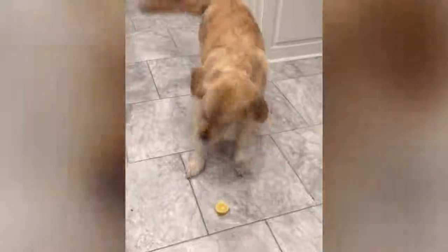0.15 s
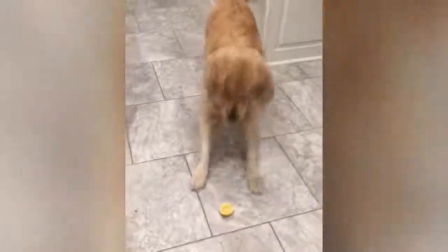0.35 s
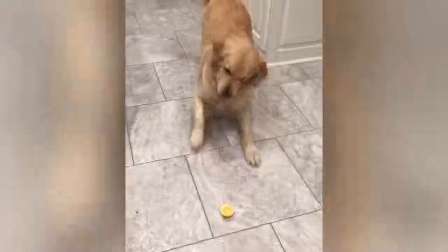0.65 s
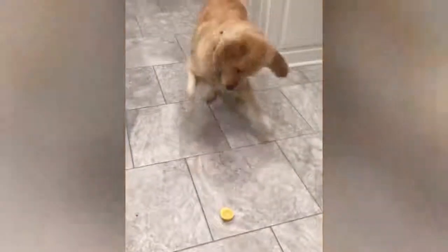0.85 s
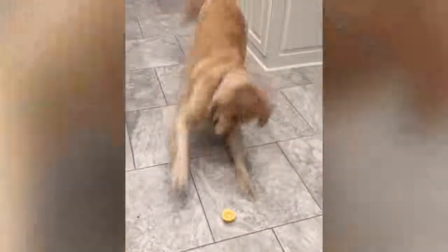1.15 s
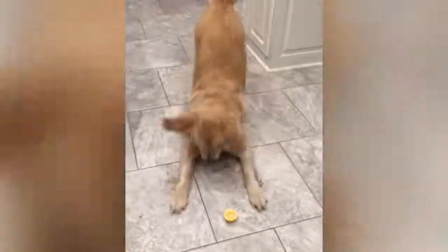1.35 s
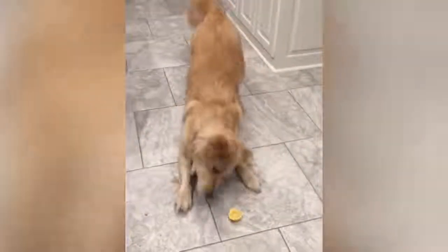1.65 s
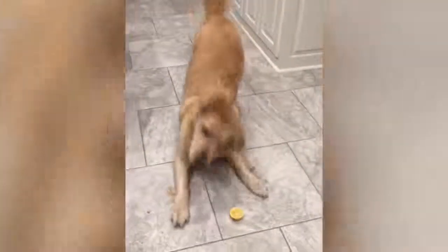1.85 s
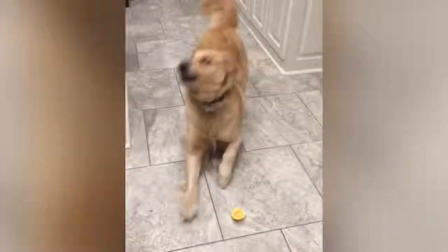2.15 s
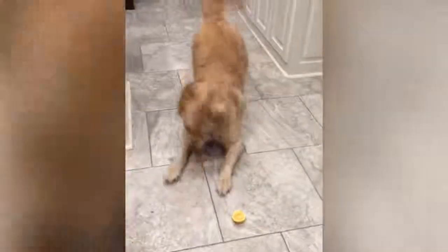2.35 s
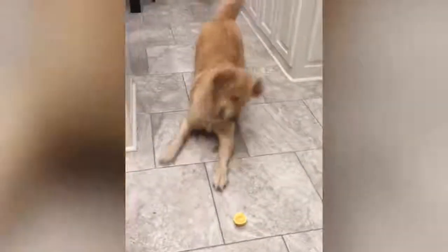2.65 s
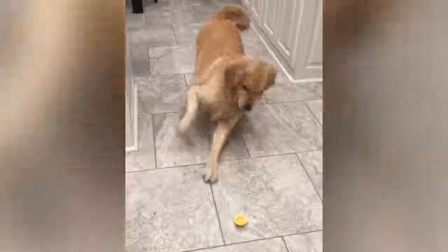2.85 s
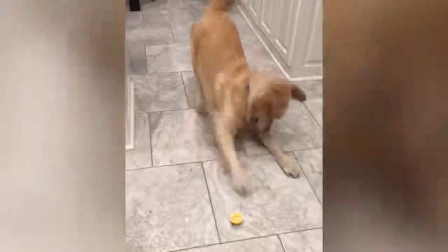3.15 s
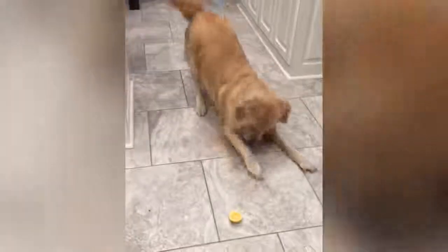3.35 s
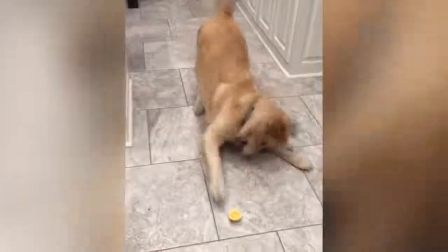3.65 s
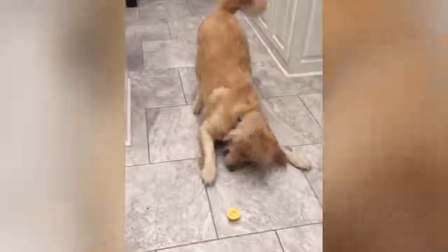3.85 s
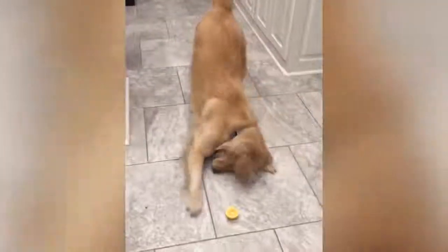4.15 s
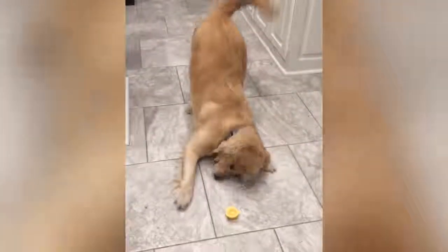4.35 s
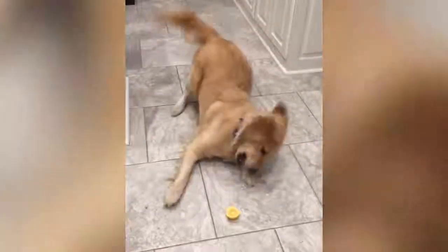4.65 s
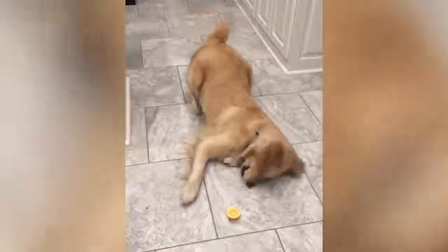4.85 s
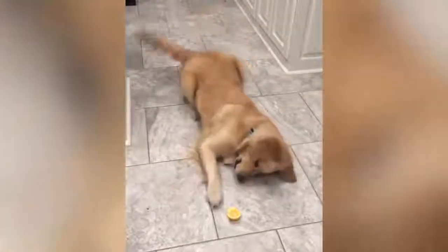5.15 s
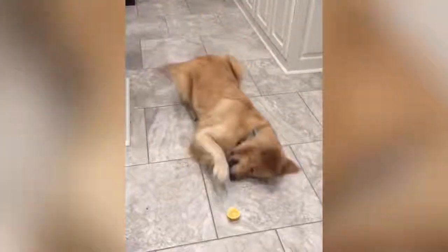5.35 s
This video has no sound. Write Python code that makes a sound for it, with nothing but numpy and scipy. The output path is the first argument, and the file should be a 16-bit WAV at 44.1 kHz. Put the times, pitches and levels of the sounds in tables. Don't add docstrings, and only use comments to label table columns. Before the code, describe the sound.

A dog's claws tick and rake on hard kitchen tile as its paws skid, thud and squeal, with collar tags clinking over a faint hum.

```python
import sys
import numpy as np
from scipy import signal
from scipy.fft import rfft, irfft
from scipy.io import wavfile
from scipy.ndimage import uniform_filter1d

SR = 44100
rng = np.random.default_rng(int(sys.argv[2]) if len(sys.argv) > 2 else 0)


def dump_mix(stems):
    frames = np.atleast_2d(stems).T
    limited = np.clip(frames, -1, 1)
    pcm = np.round(limited * 32767).astype(np.int16)
    wavfile.write(sys.argv[1], SR, pcm)


def undo_db(level):
    steps = np.asarray(level, float) / 20
    return 10 ** steps


N = 243431
CONTROL_STEP = 32


def evened(x):
    return x / np.sqrt(np.mean(x ** 2) + 1e-20)


def read(points, hz):
    f, value = np.transpose(points)
    return np.interp(np.log(hz + 1), np.log(f + 1), value)


def add(mix, s, sound):
    part = mix[round(s * SR):][:len(sound)]
    part += sound[:len(part)]


def coloured(x, points):
    hz = np.fft.rfftfreq(len(x), 1 / SR)
    return evened(irfft(rfft(x) * undo_db(read(points, hz)), len(x)))


def resonate(x, hz, width_hz):
    turn = np.exp(2j * np.pi * np.cumsum(hz * np.ones(len(x))) / SR)
    r = np.exp(-np.pi * width_hz / SR)
    return 2 * (turn * signal.lfilter([1 - r], [1, -r], x / turn)).real


def grit(per_s, spread_db, smooth, clump_db):
    size = undo_db(spread_db * np.minimum(rng.exponential(1, N), 4)) * (rng.random(N) < per_s / SR)
    slips = evened(size * rng.choice([-1., 1.], N)) + smooth * rng.standard_normal(N)
    clumps = evened(uniform_filter1d(uniform_filter1d(rng.standard_normal(N), 300), 300))
    return slips * undo_db(clump_db * clumps)


def swells(rows):
    fade_db = 25.5
    rise_bend, fall_bend = 1.36, 1.22
    s, db, rise, fall = np.array(rows)[:, :4].T[:, :, None]
    since = np.arange(0, N + CONTROL_STEP, CONTROL_STEP) / SR - s
    lost = np.where(since < 0, abs(since / rise) ** rise_bend, abs(since / fall) ** fall_bend)
    return undo_db(2 * np.maximum(db - fade_db * lost, -200)), since


def spread(control):
    return np.interp(np.arange(N) / CONTROL_STEP, np.arange(len(control)), control)


def level(power, rest_db):
    return spread(np.sqrt(power.sum(0) + undo_db(2 * rest_db)))


def hum():
    # frequency in Hz, level in dB per Hz.
    hum_spectrum = [(15, -67), (25, -17), (70, 4), (166, -3.5), (217, -18), (285, 2), (317, 1),
                    (427, -13.5), (516, -16), (607, -7.5), (840, -9), (1290, -8.5), (16000, -39)]
    hum_db, drift_db = -71, 0.12
    drift = evened(uniform_filter1d(rng.standard_normal(N), 3000))
    return undo_db(hum_db + drift_db * drift) * coloured(rng.standard_normal(N), hum_spectrum)


def room(x):
    # frequency in Hz, t60 in seconds.
    decay = [(100, 0.32), (300, 0.67), (1000, 0.58), (3000, 0.48), (8000, 0.42), (16000, 0.15)]
    # delay in ms, level in dB.
    echoes = [(4.5, -27), (7.3, -17.5), (10.2, -18), (15.6, -15), (21.4, -23), (27.7, -21.5)]
    tail_db = -8.5
    taps = np.zeros(SR // 2)
    at = np.arange(100, len(taps) - 20, 20)
    taps[at + rng.integers(0, 20, len(at))] = rng.choice([-1., 1.], len(at))
    hz, t, z = signal.stft(taps, SR, nperseg=256)
    tail = signal.istft(z * undo_db(-60 * t / read(decay, hz)[:, None]), SR, nperseg=256)[1]
    tail = undo_db(tail_db) * tail / np.linalg.norm(tail)
    for ms, db in echoes:
        tail[round(ms * SR / 1000)] += undo_db(db)
    return signal.fftconvolve(x, tail)[:N]


def weight_shifts():
    # start of the heave's peak in seconds, level in dB, rise and fall in seconds.
    heaves = [(.6, -83, 0.066, 0.83), (1.3, -55.5, 0.079, 0.2), (1.41, -60.5, 0.13, 0.31),
              (2.2, -65, 0.15, 0.14), (2.33, -64.5, 0.037, .3), (2.724, -65.5, 0.2, 0.025),
              (2.9, -63.5, 0.16, 0.73), (3.265, -46, 0.057, 0.2), (3.9, -65.5, 0.63, 0.32),
              (4.205, -55, 0.058, 0.14), (4.5, -65, 0.56, 0.5)]
    # frequency in Hz, level in dB per Hz.
    rumble_spectrum = [(24, -47), (40, -16), (85, -2), (191, -0.5), (229, -3.5), (401, -8), (551, -8),
                       (747, -11), (1500, -20.5), (1950, -21), (3300, -120)]
    rumble = coloured(grit(per_s=400, spread_db=0.5, smooth=1.14, clump_db=4.0), rumble_spectrum)
    return level(swells(heaves)[0], rest_db=-72) * rumble


def squeaks():
    # start in seconds, level in dB, pitch in Hz, t60 in seconds.
    rubs = [(1.729, -65, 1550, 0.075), (2.135, -62, 2490, 0.13), (2.157, -59, 1500, 0.14),
            (2.157, -57.5, 630, 0.084), (1.413, -48.5, 1420, 0.048), (2.195, -59.5, 887, 0.3),
            (3.115, -64, 930, 0.11), (3.639, -47, 1485, 0.037), (3.642, -60, 2090, 0.21),
            (4.968, -63.5, 2630, 0.12), (4.968, -44.5, 5600, 0.023), (5.001, -56.5, 2660, 0.082),
            (5.001, -62, 2210, 0.17)]
    out, t = np.zeros(N), np.arange(6000) / SR
    noises = rng.standard_normal((len(rubs), len(t)))
    for (s, db, hz, t60), noise in zip(rubs, noises):
        tone = evened(resonate(resonate(noise, hz, width_hz=170), hz, width_hz=280))
        onset = 1 - np.exp(-t / 0.00059)
        add(out, s, undo_db(db - 60 * t / t60) * tone * onset)
    return out


def tags():
    # start in seconds, then levels in dB of tick, small tag, large tag, large tag's high mode.
    knocks = [(1.9, -47, -55, -45.5, -67), (2.119, -42, -73, -72, -61), (2.126, -31, -75, -57, -49.5),
              (2.132, -31, -58, -47, -48.5), (2.271, -40, -61, -53, -62), (2.304, -35, -59, -43, -64),
              (2.376, -24.5, -65, -52.5, -64), (2.5634, -21.5, -59, -77, -68.5),
              (4.6548, -35, -67, -74, -64), (4.865, -32, -71, -59, -68), (4.8862, -37, -88, -72, -70),
              (4.9673, -21.5, -65, -37.5, -49), (4.9998, -34, -59, -47, -55)]
    # level in dB of the hook that holds the tags, share of ring time left by the coat.
    holds = [(-64, 0.78), (-58, .4), (-52, 0.55), (-52, 0.57), (-54, 0.5), (-48, 0.76), (-62, .6),
             (-60, 0.41), (-62, 0.44), (-72, 0.34), (-72, 0.66), (-47, 1.05), (-56, 1.2)]
    mode_hz = [
        [7101, 7062, 10650, 5900],
        [8068, 8104, 9507, 10300, 12740],
        [14825, 14870, 9850, 13900],
        [15165, 12870, 15720],
    ]
    # level in dB, t60 in seconds.
    mode_decay = [
        [(10.5, 0.22), (-2, 0.44), (-2, 0.08), (-10, 0.018)],
        [(-2.5, 0.3), (-4.5, 0.39), (-17, 0.058), (-29, 0.095), (-9, 0.085)],
        [(10, 0.21), (-5, 0.16), (0, 0.25), (-29, .1)],
        [(-8, 0.093), (-17, 0.084), (-16, .06)],
    ]
    pressed_s = 5.115
    out, t = np.zeros(N), np.arange(9000) / SR
    phases = rng.random((len(knocks), 2, 20))
    for (s, tick_db, *parts_db), (hook_db, share), (phase, swing) in zip(knocks, holds, phases):
        ring = np.zeros(len(t))
        for k, part_db in enumerate(parts_db + [hook_db]):
            for m, (hz, (db, t60)) in enumerate(zip(mode_hz[k], mode_decay[k])):
                flutter_hz, wobble_hz = 25 + 45 * swing[5 * k + m], 20 + 30 * phase[5 * k + m]
                flutter_db = 3.0 * np.sin(2 * np.pi * (flutter_hz * t + phase[m]))
                wobble = .12 * np.sin(2 * np.pi * (wobble_hz * t + swing[m]))
                decay = undo_db(part_db + db + flutter_db - 60 * t / (t60 * share))
                ring += decay * np.sin(2 * np.pi * (hz * t + phase[5 * k + m] + wobble))
        tick = undo_db(tick_db - 11.0) * np.sin(2 * np.pi * 9500 * t) * np.exp(-t / 0.0005)
        ring *= undo_db(-np.maximum(s + t - pressed_s, 0) * 600)
        add(out, s, ring * (1 - np.exp(-t / 0.00022)) + tick)
    return out


def thuds():
    # start in seconds, peak in dB, slap pitch in Hz, t60 in seconds.
    falls = [(1.263, -32, 930, 0.024), (1.27, -42.5, 270, 0.18), (1.399, -40.5, 156, 0.034),
             (1.416, -39.5, 188, 0.07), (2.32, -43, 152, 0.058), (2.705, -45.5, 745, 0.11),
             (2.994, -48, 100, 0.053), (3.114, -54.5, 890, 0.071), (3.24, -25, 750, 0.033),
             (3.261, -46.5, 180, 0.072), (3.3, -48, 202, 0.45), (4.187, -38.5, 244, 0.085),
             (4.207, -42.5, 204, 0.23), (5.298, -54, 137, 0.046)]
    out, t = np.zeros(N), np.arange(8000) / SR
    puffs = rng.standard_normal((len(falls), len(t)))
    for (s, db, hz, t60), puff in zip(falls, puffs):
        push = np.sin(2 * np.pi * hz * t) * undo_db(-60 * t / (2.15 / hz * 4))
        narrow_hz = .55 * hz * (hz / 250) ** .4
        puff = evened(resonate(resonate(puff, hz, width_hz=narrow_hz), hz, width_hz=1.5 * hz))
        shape = (1 - np.exp(-t / 0.0044)) * undo_db(-60 * t / max(t60, .01))
        add(out, s + 0.00117, undo_db(db) * (push + 0.61 * puff * shape))
    return out


def drags():
    # most contact in seconds, level in dB, rise and fall in s, fur share in dB.
    sweeps = [(.432, -61, 0.2, 0.25, 0), (.51, -65, 0.14, 0.15, -14), (.8, -59.5, 0.15, 0.09, -11),
              (1.075, -86, .03, 0.055, 13), (1.21, -56.5, 0.12, 0.12, -1.5), (1.36, -57, 0.13, 0.26, -8),
              (1.55, -61, 0.23, 0.12, -9), (1.743, -66, 0.043, 0.26, -5.5), (2.136, -56.5, 0.097, 0.17, 0),
              (2.28, -56.5, 0.11, 0.059, -14), (2.499, -59.5, 0.21, 0.031, 1.5),
              (2.566, -57, 0.054, 0.068, 3), (2.724, -55, 0.027, 0.13, -6), (2.884, -67.5, 0.055, 0.44, -4),
              (3.0, -63, 0.034, 0.079, -3), (3.201, -53.5, 0.042, 0.18, -5), (3.5, -60.5, 0.38, 0.092, -11),
              (4.07, -61, 0.12, .2, -5.5), (4.144, -52, 0.061, 0.044, -11), (4.4, -63, 0.13, 0.35, -9),
              (4.552, -57, 0.13, 0.25, -4.5), (4.882, -60.5, 0.07, 0.28, -8),
              (5.31, -67.5, 0.023, .09, -10), (5.36, -74.5, 0.03, 0.04, 5), (5.45, -78.5, 0.16, .3, -16)]
    # peak in seconds, level in dB, fall in s, fur share in dB.
    scuffs = [(0.29, -65.5, 0.39, -2), (0.553, -47.5, 0.21, -8), (.708, -57.5, 0.19, -6),
              (1.134, -52, 0.1, -1), (1.269, -46.5, 0.13, -3.5), (1.873, -66.5, 0.47, 4),
              (2.307, -46.5, 0.052, -0.5), (3.245, -53.5, 0.31, -7), (3.605, -61, 0.092, -2),
              (3.755, -43, 0.14, -5), (4.188, -50, .18, -4), (4.974, -64, 0.11, 10),
              (5.123, -52.5, 0.11, -9)]
    # frequency in Hz, level in dB per Hz.
    claw_spectrum = [(1470, -17), (2500, -10), (2710, -2), (4170, 1.5), (4800, -1), (6040, 5),
                     (10000, -12.5), (13000, -20.5), (22000, -120)]
    # frequency in Hz, level in dB per Hz.
    fur_spectrum = [(5000, -45), (8500, 0.5), (10500, -5), (15600, -6.5), (16500, -9.5)]
    scuff_rise_s = 0.013
    moves = np.array(sweeps + [(s, db, scuff_rise_s, fall, fur_db) for s, db, fall, fur_db in scuffs])
    raking = swells(moves)[0]
    brush = grit(per_s=4400, spread_db=4.5, smooth=1.3, clump_db=1.5)
    fur_share = undo_db(2 * (moves[:, 4:] - 0.12 * moves[:, 1:2]))
    fur = level(raking ** 1.135 * fur_share, rest_db=-108) * coloured(brush, fur_spectrum)
    return level(raking, rest_db=-86) * coloured(brush, claw_spectrum) + fur


def skids():
    # most pressure in seconds, level in dB, rise and fall in seconds, resonance in Hz.
    slips = [(.29, -66.5, 0.026, 0.094, 3180), (.432, -67.5, 0.14, 0.12, 3090),
             (0.565, -41.5, 0.029, 0.24, 2930), (0.671, -46.5, 0.12, 0.21, 2040),
             (1.135, -58, 0.021, 0.22, 2840), (1.275, -62, 0.016, 0.31, 2830), (1.33, -63, .05, 0.11, 2200),
             (1.42, -59, 0.25, 0.2, 1700), (1.74, -57.5, 0.044, 0.05, 2900), (2.135, -69, 0.12, 0.95, 2900),
             (2.321, -44, 0.044, 0.23, 2800), (2.66, -62, 0.066, 0.19, 2100),
             (2.724, -49, 0.21, 0.15, 2000), (2.884, -55.5, 0.27, 0.25, 2200),
             (3.202, -57.5, 0.056, 0.037, 2620), (3.25, -63, 0.017, 0.18, 2600),
             (3.3, -56.5, 0.04, 0.11, 1800), (3.379, -50.5, 0.22, 0.23, 2600),
             (3.645, -62.5, 0.058, 0.099, 1700), (3.757, -45.5, .007, 0.1, 2950),
             (3.828, -44.5, 0.063, 0.15, 2400), (3.999, -54, 0.29, 0.24, 2180),
             (4.188, -54, 0.029, 0.2, 2750), (4.552, -56.5, 0.28, 0.27, 2000),
             (5.125, -57, 0.013, 0.24, 2590), (5.31, -55.5, 0.029, 0.11, 1980)]
    # ratio to the skid resonance, width in Hz, level in dB.
    ridges = [
        (0.702, 313, -14.5),
        (1.08, 320, -15.5),
        (1.32, 380, -21.5),
    ]
    sag_hz_per_s, lowest_hz = 3900, 1797
    rest_db, rest_hz = -78.5, 2100
    pads, since = swells(slips)
    each_hz = np.maximum(np.array(slips)[:, 4:] - sag_hz_per_s * np.maximum(since, 0), lowest_hz)
    rest = undo_db(2 * rest_db)
    hz = spread(((pads * each_hz).sum(0) + rest * rest_hz) / (pads.sum(0) + rest))
    rub = grit(per_s=1800, spread_db=3.4, smooth=.65, clump_db=1.5)
    skid = resonate(resonate(rub, .93 * hz, width_hz=1700), .93 * hz, width_hz=2400)
    skid += undo_db(-15.5) * resonate(rub, 0.59 * hz, width_hz=720)
    skid = evened(skid)
    sway = 1 + .05 * evened(uniform_filter1d(np.roll(rub, SR), 1500))
    squeal = np.zeros(N)
    for ratio, width, db in ridges:
        ridge_hz = ratio * hz * sway
        squeal += undo_db(db) * evened(resonate(resonate(rub, ridge_hz, width), ridge_hz, width))
    skid = signal.sosfilt(signal.butter(2, 520, "high", fs=SR, output="sos"), skid + squeal)
    return level(pads, rest_db) * evened(skid)


def ticks():
    # start in seconds, peak in dB, pitch in Hz. The first two are small clinks of the collar hook.
    catches = [(0.279, -48, 12800), (0.287, -47, 5500), (0.5666, -32, 3160), (0.5732, -33, 3120),
               (0.616, -35, 2980), (0.6544, -29, 2430), (0.675, -38, 2470), (0.7972, -36, 5400),
               (2.3105, -30, 2580), (2.325, -46, 5400), (2.3412, -55, 2820), (3.1983, -33, 5980),
               (3.2526, -24, 6100), (3.3552, -35, 2350), (3.367, -24, 3260), (3.763, -27, 5470),
               (3.8104, -32, 2890), (3.83, -46, 1500), (3.8422, -46, 2140), (3.8565, -31, 2420),
               (4.1823, -44, 1400), (4.9254, -49, 7400), (5.119, -33, 5630), (5.1334, -34, 5310),
               (5.1494, -42, 6940), (5.1654, -36, 5520), (5.2354, -49, 2210), (5.2903, -46, 1660),
               (5.2985, -48, 1690), (5.308, -46, 2010), (5.346, -50, 1670)]
    out, t = np.zeros(N), np.arange(400) / SR
    for s, db, hz in catches:
        add(out, s, undo_db(db - 3.0) * np.sin(2 * np.pi * hz * t) * np.exp(-t * hz / 1.5))
    return out


def claws():
    # start in seconds, peak in dB, centre
    # in Hz, treble share in dB.
    strikes = [(0.2973, -45, 6000, -31), (0.4234, -37, 8300, -24), (0.437, -36, 5800, -22),
               (0.5016, -32.5, 6400, -46), (0.5476, -33, 5600, -35), (0.6139, -34, 4320, -32),
               (0.703, -37, 6220, -25), (0.7104, -38, 5780, -19), (0.7744, -40.5, 5970, -32),
               (1.069, -47, 7310, 6), (1.125, -25, 6540, -54), (1.264, -16, 6300, -23),
               (1.8677, -38.5, 5510, -20), (2.271, -40, 7900, -32), (2.301, -33, 8100, -31),
               (2.3164, -33, 4170, -21), (2.6944, -45, 4070, -9), (2.7308, -33.5, 5080, 37),
               (2.9906, -44, 5740, -20), (3.1817, -53.5, 4570, -31), (3.1911, -34, 6500, -33),
               (3.199, -34, 5980, -3), (3.236, -14.5, 6140, -21), (3.6002, -41, 8200, -25),
               (3.7477, -19.5, 4800, -18), (4.0847, -41, 5800, -21), (4.1799, -17.5, 5840, -19.5),
               (4.8636, -47, 7000, -2), (4.8858, -42, 7940, -17), (5.1175, -28.5, 5600, -28),
               (1.728, -45, 3200, -37), (2.3267, -44, 4800, -18), (2.6236, -45, 2560, -25),
             (2.6758, -46, 3030, -20), (2.7108, -28.5, 2070, -34), (2.871, -46, 2410, -34),
             (2.889, -35, 2250, -38), (3.254, -40, 4520, -22), (3.3644, -28.5, 3140, -50),
             (3.638, -44.5, 2120, -33), (3.943, -45, 2270, -45), (5.134, -49, 4800, -27),
             (5.289, -46.5, 3360, -51), (5.3058, -49, 2040, -48)]
    paw_spread_ms, scratch_db = 1.6, -21.5
    out, t = np.zeros(N), np.arange(2600) / SR
    blows = strikes
    chance = rng.random((len(blows), 8))
    scratch = rng.standard_normal((len(blows), len(t)))
    bright = signal.butter(2, [7500, 14000], "band", fs=SR, output="sos")
    thin = signal.butter(2, 1500, "high", fs=SR, output="sos")
    for (s, db, hz, treble_db), luck, noise in zip(blows, chance, scratch):
        taps = undo_db(scratch_db) * noise * undo_db(-60 * t / 0.044)
        delays = paw_spread_ms / 1000 * (np.arange(4) + .6 * luck[:4]) / 3
        taps[(delays * SR).astype(int)] += undo_db(-6 * luck[4:]) * [1, -1, -1, 1]
        body = resonate(resonate(taps, hz, width_hz=4400), hz, width_hz=7900)
        treble = evened(signal.sosfilt(bright, taps))
        tick = evened(signal.sosfilt(thin, body)) + undo_db(treble_db + 12.0) * treble
        add(out, s + .0006, undo_db(db) * tick / abs(tick).max())
    return out


def scene():
    hits = claws() + thuds() + squeaks() + ticks()
    metal = tags()
    rubbing = skids() + drags() + weight_shifts()
    sent = hits + undo_db(-9) * metal + undo_db(-3.5) * rubbing
    return (hits + metal + rubbing + room(sent) + hum())[None]


def sharpen(x):
    strength = 0.16
    z = signal.stft(x, SR, nperseg=1024, noverlap=768)[2]
    power = abs(z) ** 2 + 1e-20
    around = uniform_filter1d(power, size=24, axis=0)
    frame_db = 10 * np.log10(power[40:].sum(0))
    steady = abs(np.roll(frame_db, -2) - np.roll(frame_db, 2)) < 7
    gain = np.clip(power / around, .01, 6) ** strength
    gain /= np.sqrt(uniform_filter1d(power * gain ** 2, size=24, axis=0) / around)
    return signal.istft(z * np.where(steady, gain, 1), SR, nperseg=1024, noverlap=768)[1][:N]


def band_limit(x, open_db, loud_db):
    edge_hz, quiet_edge_hz = 15850, 12000
    hz, t, z = signal.stft(x, SR, nperseg=512)
    top_db = 10 * np.log10(uniform_filter1d(abs(z) ** 2, size=12, axis=0) + 1e-20)
    faint = (hz[:, None] > quiet_edge_hz) & (uniform_filter1d(top_db, size=5, axis=1) < open_db)
    over = (hz[:, None] > edge_hz) & (top_db < loud_db)
    return signal.istft(z * ~(faint | over), SR, nperseg=512)[1][:N]


def starve(x):
    # centre in seconds, threshold in dB.
    thin_moments = [(.005, 3), (.178, 2), (1.308, 1.5), (1.52, 1.5), (1.668, 2.5), (1.905, 1), (2.457, 3.5),
                    (2.503, 5), (2.565, 5.5), (2.822, -1), (3.29, -2), (4.144, 3.5), (5.083, 2)]
    out, size = x.copy(), 1500
    window = np.sin(np.pi * (np.arange(size) + .5) / size)
    for s, keep_db in thin_moments:
        start = max(round(s * SR) - size // 2, 0)
        at = slice(start, start + size)
        z = rfft(out[at] * window)
        weak = abs(z) < undo_db(keep_db) * np.sqrt(uniform_filter1d(abs(z) ** 2, size=150))
        change = np.where(weak, -.93, .35) * (np.arange(len(z)) > 8)
        out[at] += window * irfft(z * change, size)
    return out


def top_cut(x):
    return signal.sosfilt(signal.butter(12, 17000, fs=SR, output="sos"), x)


def record(dry):
    heard = signal.sosfilt(signal.butter(2, 65, "high", fs=SR, output="sos"), dry[0])
    limited = band_limit(sharpen(heard), open_db=-113, loud_db=-67)
    thinned = starve(limited)
    return top_cut(thinned[None])


dry = scene()
out = record(dry)
dump_mix(out)
```